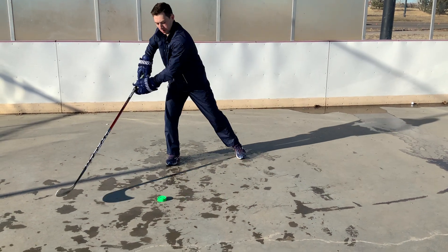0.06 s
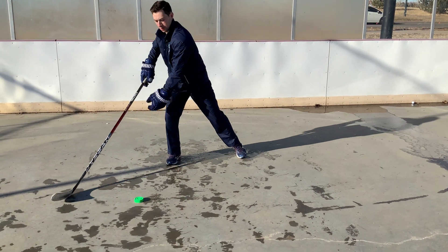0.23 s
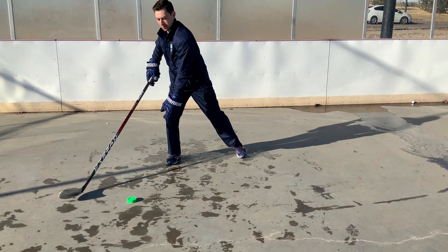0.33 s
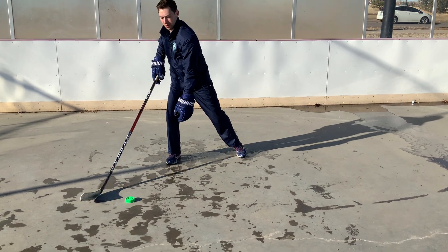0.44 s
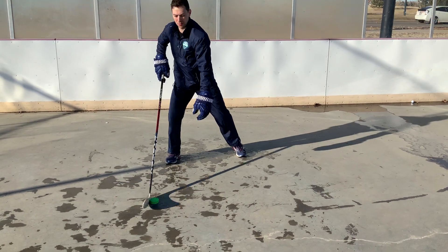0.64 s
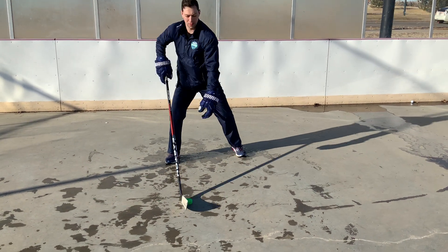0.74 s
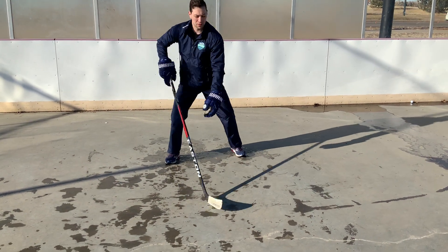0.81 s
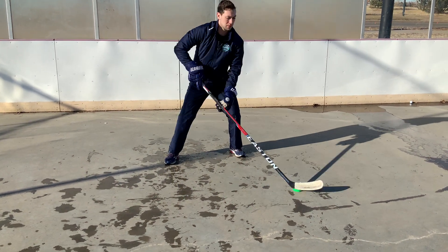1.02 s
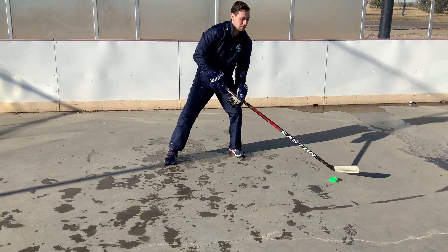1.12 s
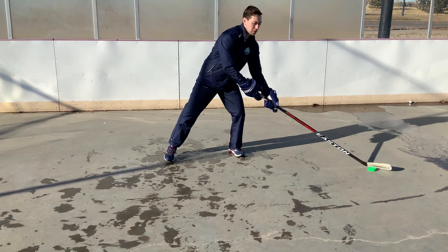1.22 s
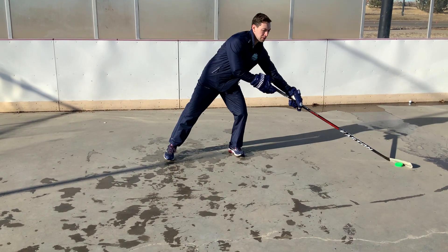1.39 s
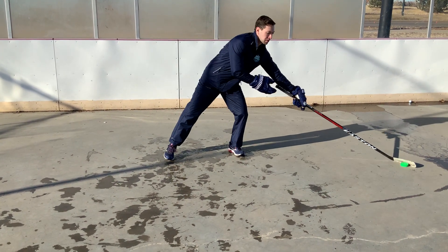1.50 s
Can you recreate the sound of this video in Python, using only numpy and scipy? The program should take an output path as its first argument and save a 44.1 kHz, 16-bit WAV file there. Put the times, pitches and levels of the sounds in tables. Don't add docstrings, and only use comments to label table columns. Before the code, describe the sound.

A hockey stick blade taps concrete twice softly, then cracks hard with a quick bounce; after a scraping pause it knocks a hollow plastic ball and slaps flat, outdoors, through a small stereo microphone over faint traffic.

```python
import sys
import numpy as np
from scipy import signal
from scipy.fft import rfft, irfft, next_fast_len
from scipy.io import wavfile
from scipy.ndimage import map_coordinates

SR = 44100
rng = np.random.default_rng(int(sys.argv[2]) if len(sys.argv) > 2 else 0)


def gain_from_decibels(decibels):
    exponent = np.asarray(decibels, float) / 20
    return 10 ** exponent


def master_out(mix):
    frames = np.transpose(np.atleast_2d(mix))
    ceiling = np.clip(frames, -1, 1)
    pcm = np.round(ceiling * 32767).astype(np.int16)
    wavfile.write(sys.argv[1], SR, pcm)


N = 68355


def unit(x):
    return x / np.sqrt(np.mean(x ** 2) + 1e-20)


def peak(x):
    return x / abs(x).max()


def along(points, hz):
    f, v = np.transpose(points)
    return np.interp(np.log(hz + 1), np.log(f + 1), v)


def curves(rows):
    s, *cols = np.transpose(rows)
    return [np.interp(np.arange(N) / SR, s, c) for c in cols]


def wobble(rate):
    knots = rng.standard_normal(int(N * rate / SR) + 4)
    return map_coordinates(knots, [np.arange(N) * rate / SR])


def filtered(x, response):
    n = x.shape[-1]
    m = next_fast_len(n + 8192)
    return irfft(rfft(x, m) * response(np.fft.rfftfreq(m, 1 / SR)), m)[..., :n]


def turn_by(points, hz):
    return np.exp(1j * np.interp(hz, *np.transpose(points)))


def rush(spectrum):
    noise = rng.standard_normal((2, N))
    return unit(filtered(noise, lambda hz: gain_from_decibels(along(spectrum, hz))))


def add(track, s, sound):
    part = track[round(s * SR):][:len(sound)]
    part += sound[:len(part)]


# pitch_hz, level_db
TRAFFIC_COLOUR = [(12, -53), (20, -6.5), (97, -5), (217, -8), (367, -17), (538, -12), (714, -20),
                  (1360, -28), (2500, -41.5), (3250, -79), (5500, -120)]
# start_s, level_db
TRAFFIC_LEVEL = [(0, -44.5), (.5, -46.5), (.9, -47.5), (1.55, -46.5)]


def traffic():
    lumps_db = 1.25 * wobble(12.24)
    return gain_from_decibels(curves(TRAFFIC_LEVEL)[0] + lumps_db) * rush(TRAFFIC_COLOUR)


# start_s, level_db, body_db
SCRAPE_STROKES = [(0, -60.5, -35), (.12, -55.5, -23), (.25, -61, 0.5), (.33, -66.5, 4), (.41, -80.5, 22.5),
                  (.43, -76.5, 27), (.54, -66.5, 16), (.6, -53, 9.5), (.75, -56.5, 1), (.9, -59, 5),
                  (.99, -61.5, 8), (1.1, -55.5, -2), (1.18, -56, 2), (1.22, -48, 4), (1.27, -56.5, -21),
                  (1.4, -54.5, 0), (1.48, -62.5, 8), (1.55, -74.5, 8)]
# pitch_hz, level_db
GRIT_HISS = [(2200, 7), (4500, -1.5), (6000, 2.5), (7000, -3), (8000, 1.5), (11000, 5), (13800, 1.5),
             (15200, 2)]
# pitch_hz, level_db
BLADE_BODY = [(500, 2), (800, 8), (1100, 6), (1600, -0.5), (2200, 1.5), (2800, -6), (4500, -10.5),
              (7000, -77)]


def scrape():
    level_db, body_db = curves(SCRAPE_STROKES)
    hiss = rush(GRIT_HISS) * gain_from_decibels(0.2 * wobble(23.7) + 1.9 * wobble(270))
    body = rush(BLADE_BODY) * gain_from_decibels(body_db + 2.03 * wobble(41.55) + 4.4 * wobble(140))
    return gain_from_decibels(level_db) * (hiss + body)


def scatter(seconds):
    t = np.arange(SR // 20) / SR
    puff = rng.standard_normal(len(t)) * np.exp(-t / seconds)
    return puff / np.linalg.norm(puff)


RISE_CYCLES, LATE_CYCLES = 0.48, 0.612
CONTACT_S, CHATTER_DB = 0.0011, -2.5
KNOCK_DB, KNOCK_T60 = -9, 0.033
CRACK_T60, FIZZ_DB, FIZZ_T60 = 0.004, -21, 0.03
PUSH_T60 = 0.006


def ringing(modes, t):
    ring = np.zeros(len(t))
    for k, (hz, level_db, t60) in enumerate(modes):
        swell = 1 - np.exp(-t * hz / RISE_CYCLES)
        ring += (-1) ** k * gain_from_decibels(level_db - 60 * t / t60) * swell * np.sin(2 * np.pi * hz * t)
    return ring + gain_from_decibels(CHATTER_DB) * signal.fftconvolve(ring, scatter(CONTACT_S))[:len(t)]


def taps(blows, modes, push_hz, push_db, crack_late_s):
    track, t = np.zeros(N), np.arange(SR // 8) / SR
    rise = np.minimum(t / 0.00041, 1)
    for s, db, upper_hz, crack_db, lower_hz in blows:
        def contact(hz):
            low_cut = (1j * hz / (lower_hz + 1j * hz)) ** 2
            high_cut = (1 + 1j * hz / (1.077 * upper_hz)) ** 4
            late = np.exp(-2j * np.pi * LATE_CYCLES * np.log(1 + hz / 300))
            return low_cut / high_cut * late

        def bright(hz):
            return (1j * hz / (4000 + 1j * hz)) ** 2 * np.exp(-2j * np.pi * hz * crack_late_s)

        ring = filtered(ringing(modes, t), contact)
        push = filtered(gain_from_decibels(-60 * t / PUSH_T60) * np.sin(2 * np.pi * push_hz * t), contact)
        knock = filtered(rng.standard_normal(len(t)) * gain_from_decibels(-60 * t / KNOCK_T60) * rise, contact)
        fading = gain_from_decibels(-60 * t / CRACK_T60) + gain_from_decibels(FIZZ_DB - 60 * t / FIZZ_T60)
        crack = filtered(rng.standard_normal(len(t)) * fading * rise, bright)
        blow = peak(ring) + gain_from_decibels(push_db) * peak(push)
        blow += gain_from_decibels(KNOCK_DB) * peak(knock) + gain_from_decibels(crack_db) * peak(crack)
        add(track, s, gain_from_decibels(db) * blow)
    return track


# start_s, level_db, upper_corner_hz, crack_db, lower_corner_hz
SOFT_BLOWS = [
    (.2396, -18.5, 1010, -50, 388),
    (.258, -29, 1480, -37, 446),
    (.4178, -17.5, 2220, -27.5, 550),
    (.4203, -19.5, 1800, -36, 520),
    (.4368, -24.5, 2770, -40, 860),
    (.449, -43, 2500, -35, 900),
]
# pitch_hz, level_db, t60_s
SOFT_MODES = [(517, -2, 0.048), (676, -6, 0.089), (813, 2, 0.055), (1038, 6.5, 0.035), (1340, 1.5, 0.032),
              (1510, 8, 0.021), (1796, -5.5, 0.054), (2104, 1.5, 0.059), (2500, -4, 0.027),
              (2704, 2, 0.029)]


def soft_taps():
    return taps(SOFT_BLOWS, SOFT_MODES, 1530, -4.8, 0.00034)


def rasps(rows, width):
    track, t = np.zeros(N), np.arange(SR // 20) / SR
    for s, db, centre_hz, length in rows:
        def band(hz):
            spread = 1j * width * hz * centre_hz
            return 1j * hz * centre_hz / (centre_hz ** 2 - hz ** 2 + spread)

        rasp = unit(filtered(rng.standard_normal(len(t)), band))
        swell = (t / length * np.exp(1 - t / length)) ** 2
        add(track, s - length / 2, gain_from_decibels(db) * rasp * swell)
    return track


# start_s, level_db, centre_hz, length_s
GRIT_SKIPS = [(.4303, -63, 8000, 0.0044), (.4537, -60, 8200, .0015), (.458, -45, 6500, 0.0013),
              (.4645, -55, 11000, .002), (0.473, -63, 8000, 0.0011), (.482, -58, 6000, 0.0079),
              (0.494, -53, 7860, 0.0023), (.5098, -58, 8950, 0.00089), (.5192, -50, 7900, 0.0014),
              (.5275, -49, 10000, 0.0013), (.5605, -28, 13000, 0.0027), (.5642, -26, 8000, 0.00025),
              (0.5728, -27, 12900, 0.00097), (0.584, -64, 13000, 0.0015), (0.679, -45.5, 1440, .006),
              (0.839, -52, 1410, 0.0066), (1.0115, -44, 8000, 0.0014), (1.0163, -42, 9000, 0.001),
              (1.02, -51, 8000, .0015), (1.0425, -44, 8900, 0.0014), (1.046, -48, 9900, 0.00082),
              (1.052, -49.5, 12000, .002), (1.2042, -33.5, 10500, 0.0026), (1.23, -47, 10000, 0.0034),
              (1.273, -34.5, 8750, 0.0017), (.384, -69, 9500, .001), (1.3065, -50, 12000, 0.0027),
              (1.3145, -48, 9100, .002), (1.4, -46.5, 2500, 0.0048), (1.4745, -50, 3860, .002)]


def grit_skips():
    return rasps(GRIT_SKIPS, 0.34)


# start_s, level_db, centre_hz, length_s
BALL_RATTLES = [
    (.4305, -36.5, 3140, .0015),
    (1.0125, -41.5, 4050, .002),
    (1.0165, -47, 2290, .003),
    (1.017, -43, 4300, .0015),
    (1.0215, -41, 2120, 0.0027),
    (1.0335, -46.5, 2340, 0.00338),
    (1.034, -42.5, 3900, .002),
    (1.043, -48, 2500, .003),
    (1.3145, -39.5, 2960, .002),
]


def ball_rattles():
    return rasps(BALL_RATTLES, 0.083)


# start_s, level_db, upper_corner_hz, crack_db, lower_corner_hz
HARD_BLOWS = [
    (.5513, -7.5, 2780, -2, 655),
    (.5718, -16, 3020, -23, 1000),
    (.6187, -32.5, 2400, -31, 686),
]
# pitch_hz, level_db, t60_s
HARD_MODES = [(519, -3, 0.028), (585, -10, 0.057), (776, -3, 0.022), (1013, -2.5, 0.041),
              (1359, 1.5, 0.019), (1520, -22, 0.0082), (1800, -10, 0.035), (2004, -4.5, 0.035),
              (2370, -9.5, 0.034), (2753, -15.5, 0.043), (3600, -18, 0.035), (3850, -6, 0.012),
              (4960, -21, 0.0087), (6500, 9, 0.017)]


def hard_taps():
    return taps(HARD_BLOWS, HARD_MODES, 1320, -6, 0.0011)


# start_s, level_db, upper_corner_hz, crack_db, lower_corner_hz
BALL_BLOWS = [
    (1.0004, -29, 2180, -1.5, 656),
    (1.0205, -37, 2778, -25, 880),
    (1.1902, -13.5, 5200, -12, 454),
    (1.1945, -25.5, 2200, -30, 490),
    (1.2032, -17, 3460, -37, 590),
    (1.2072, -17, 2760, -37, 596),
    (1.222, -33, 4050, -20, 1500),
]
# pitch_hz, level_db, t60_s
BALL_MODES = [(358, 0, 0.056), (585, -3, 0.033), (910, 2.5, 0.031), (1367, 4.5, 0.025), (1640, -4, 0.02),
              (1806, 3, 0.015), (2200, 2.5, 0.025), (2380, -7, 0.023), (2740, 5, 0.017), (2926, 8.5, 0.019),
              (3370, 5, 0.016), (4060, 13, 0.011), (4950, 2, 0.009)]


def ball_taps():
    return taps(BALL_BLOWS, BALL_MODES, 3160, -13, 0.00036)


# start_s, level_db, upper_corner_hz, crack_db, lower_corner_hz
FLAT_BLOWS = [
    (1.2694, -10, 2900, -4, 348),
    (1.2852, -24, 3050, -38, 1000),
    (1.3105, -29, 1560, -8, 300),
]
# pitch_hz, level_db, t60_s
FLAT_MODES = [(181, 0, 0.033), (520, -1.5, 0.025), (640, -6, 0.013), (775, -28, 0.013), (1085, -1.5, 0.034),
              (1346, 0.5, 0.037), (1550, -11, 0.012), (2180, 0.5, 0.0092), (2500, -8, 0.023),
              (2966, -3.5, 0.047), (3630, 3.5, 0.011), (4400, 2.5, 0.019), (5240, -8.5, 0.01)]


def flat_taps():
    return taps(FLAT_BLOWS, FLAT_MODES, 1356, 2.3, 0.0005)


# pitch_hz, t60_s
RINK_DECAY = [(200, 0.35), (1000, 0.3), (3000, 1), (10000, 0.27)]
RINK_DB = -23.5


def rink(x):
    hz, t, z = signal.stft(rng.standard_normal((2, SR // 2)), SR, nperseg=256)
    dying = gain_from_decibels(-60 * t / along(RINK_DECAY, hz)[:, None])
    tail = signal.istft(z * dying, SR, nperseg=256)[1]
    tail = tail / np.linalg.norm(tail[0])
    delayed = np.pad(x, (900, 0))[None]
    return gain_from_decibels(RINK_DB) * signal.fftconvolve(delayed, tail, axes=1)[:, :N]


# pitch_hz, turn_radians
SIDE_TURN = [(0, 0), (300, -.6), (650, -1.1), (1100, -.4), (2000, -.5), (4500, -.5), (5500, -3.1),
             (8500, -6.3)]
# pitch_hz, level_db
BACKGROUND_APART = [(150, -33.5), (400, -4), (1200, 1.5), (3000, -1), (4200, 3.5), (7000, 7.5), (9000, 6),
                    (13000, -58)]


def scene():
    ahead = soft_taps() + hard_taps() + grit_skips() + ball_rattles()
    aside = flat_taps() + ball_taps()
    turned = filtered(aside, lambda hz: turn_by(SIDE_TURN, hz))
    alike, other = scrape() + traffic() + rink(ahead + aside)
    other = filtered(other, lambda hz: gain_from_decibels(along(BACKGROUND_APART, hz)) / 2)
    left = ahead + turned + alike + other
    right = ahead + aside + alike - other
    return np.array([left, right])


# pitch_hz, width_hz, level_db
PORT_RESONANCES = [(2250, 400, 3), (3800, 400, 4), (5250, 350, 9), (8900, 600, 7), (12700, 800, 12)]
# pitch_hz, turn_radians
LEFT_PHASE = [(0, 0), (450, 3.3), (560, 4.4), (950, 10.2), (1360, 8.7), (3000, 7.9), (5200, 3.7),
              (14000, 3.8)]
# pitch_hz, level_db
LEFT_TONE = [(60, -.5), (550, -3.5), (1040, -1.5), (1200, 2.5), (2000, -3.5), (3800, -4.5), (4600, 4),
             (8800, 1), (13000, -1.5)]
LEFT_LATE_S = 35 / 44100
ROLL_HZ, TOP_HZ = 15000, 16750


def microphone(dry):
    def ports(hz):
        response = 1
        for centre, width, db in PORT_RESONANCES:
            spread = 1j * hz * width
            response = response + (gain_from_decibels(db) - 1) * spread / (centre ** 2 - hz ** 2 + spread)
        return response * (hz < TOP_HZ) / (1 + (hz / ROLL_HZ) ** 20)

    def left(hz):
        late = np.exp(-2j * np.pi * hz * LEFT_LATE_S)
        return gain_from_decibels(along(LEFT_TONE, hz)) * turn_by(LEFT_PHASE, hz) * late

    return filtered(dry, lambda hz: ports(hz) * np.array([left(hz), np.ones(len(hz))]))


def band_limit(x):
    return signal.sosfilt(signal.butter(12, 16820, fs=SR, output="sos"), x)


def record(dry):
    mix = microphone(dry)
    return band_limit(mix)


dry = scene()
out = record(dry)
master_out(out)
```